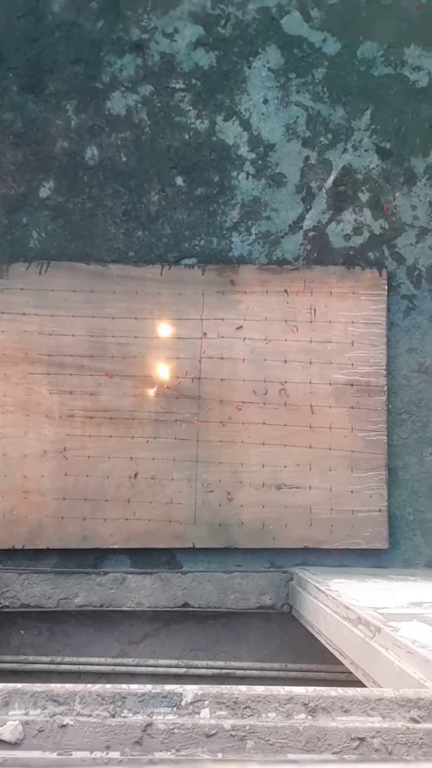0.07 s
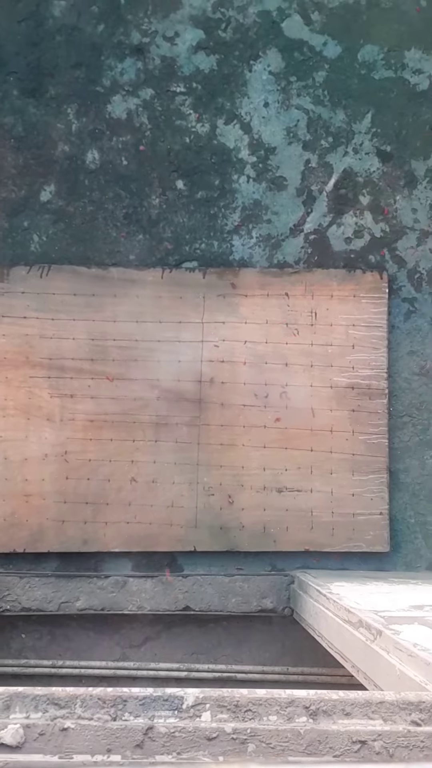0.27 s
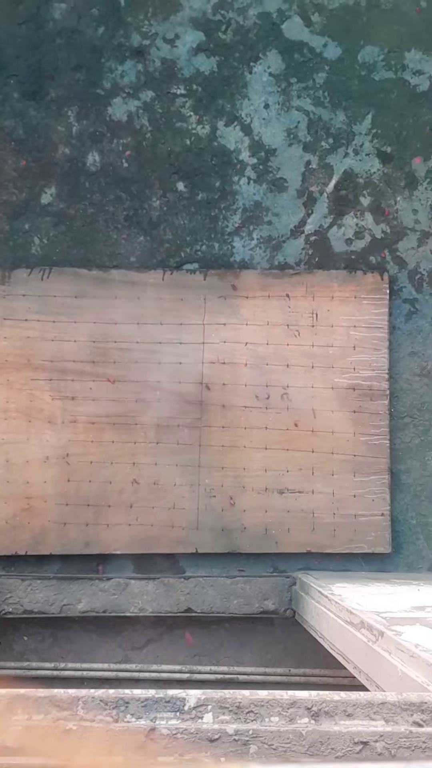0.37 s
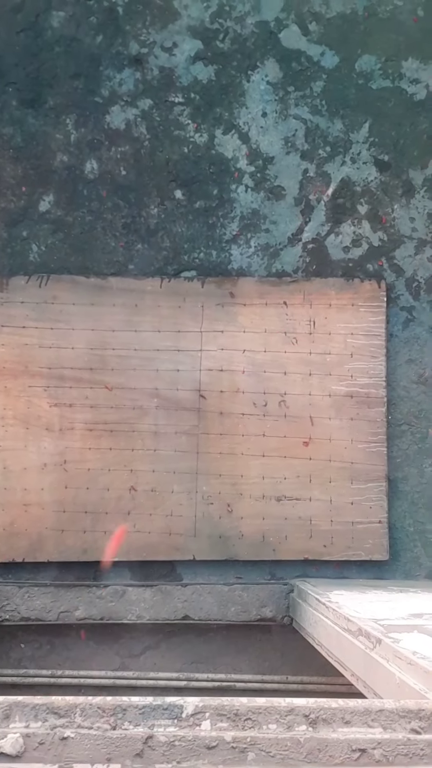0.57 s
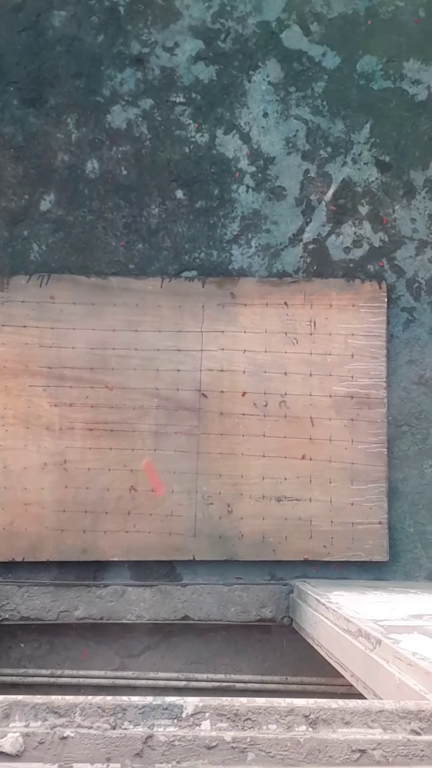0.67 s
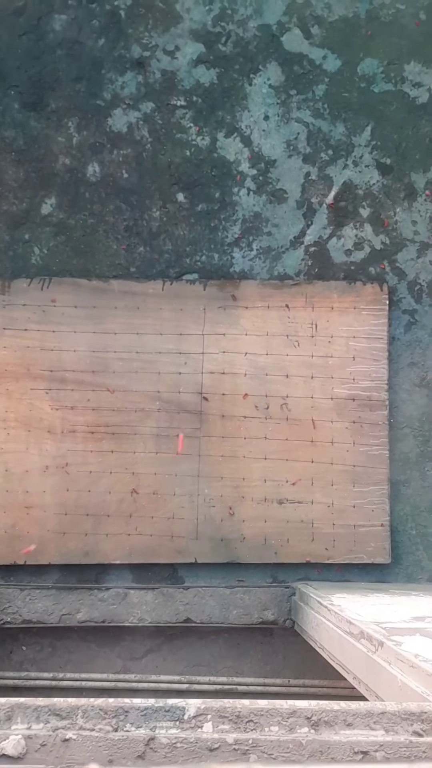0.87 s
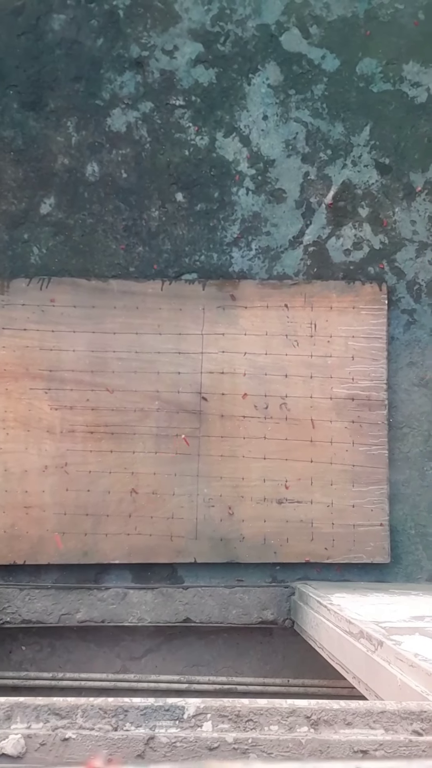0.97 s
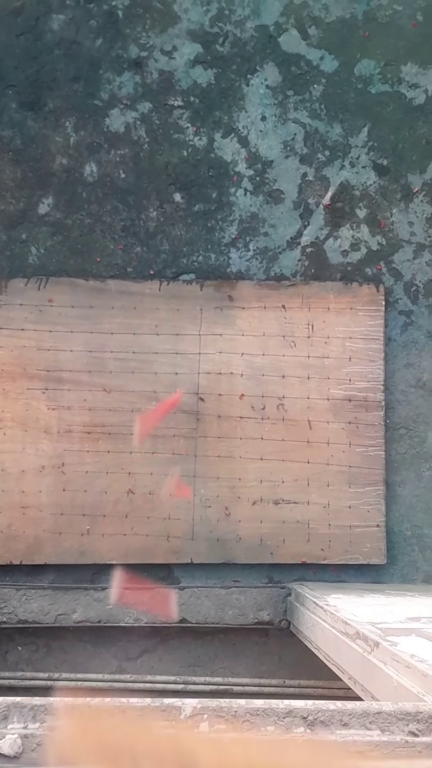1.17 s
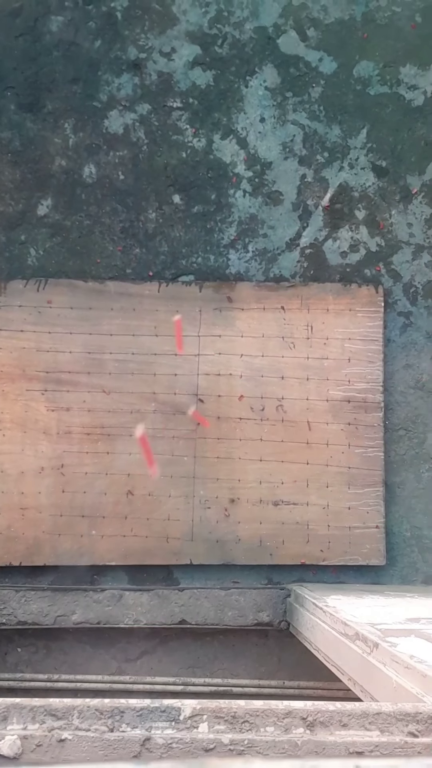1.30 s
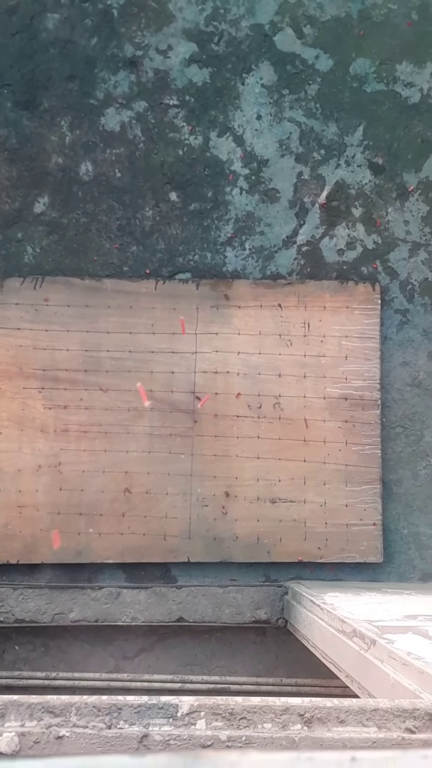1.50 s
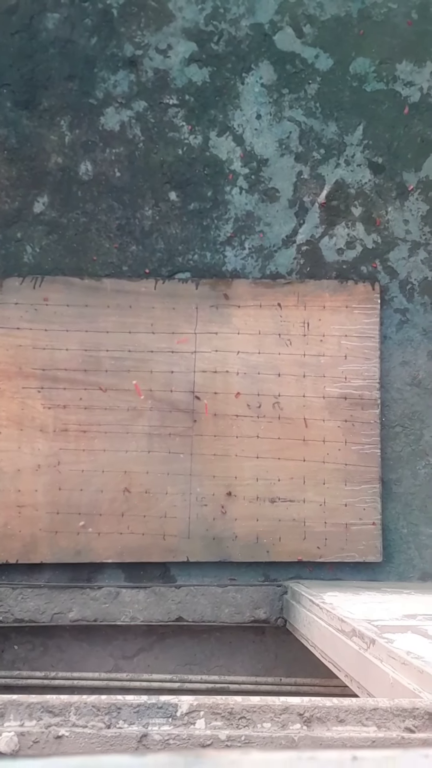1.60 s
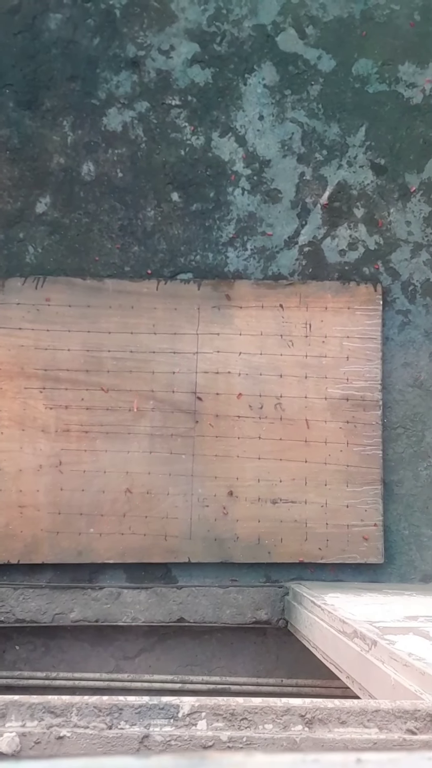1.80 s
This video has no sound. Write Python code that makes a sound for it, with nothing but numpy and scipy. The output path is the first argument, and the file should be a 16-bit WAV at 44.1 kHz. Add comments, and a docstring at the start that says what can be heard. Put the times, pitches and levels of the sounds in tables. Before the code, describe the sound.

Two small firecrackers bang in a walled yard. A stick knocks and scrapes lightly on a nearby sill, then the first bursts at 0.2 seconds, overloading the microphone into a falling, warbling squelch and low rumble until 0.45, its echo fading. Softer wooden taps come around 0.9 to 1.1 seconds. The second, shorter bang hits at 1.4 with a brief squelch, its reverberation dying into quiet air.

```python
"""A walled yard below a window, where two small firecrackers burst on a wooden board.
Each crack is reflected between the walls and dies away as reverberation; the blast buffets the
microphone and overloads it into a falling, warbling squelch. Before each bang a wooden stick knocks
and scrapes lightly on the sill close by. Beneath lie a brief handling rustle, a faint tone and quiet air."""
import sys
import numpy as np
from scipy import signal
from scipy.fft import rfft, irfft
from scipy.io import wavfile

SR = 44100
rng = np.random.default_rng(int(sys.argv[2]) if len(sys.argv) > 2 else 0)


def inscribe(sig):
    """Save sig as 16-bit PCM at rate SR to the path in sys.argv[1].

    A 1-D sig is mono; a 2-D sig holds one channel per row.
    Samples are clipped to [-1, 1] before scaling.
    """
    pcm = np.round(np.clip(np.atleast_2d(sig).T, -1, 1) * 32767)
    wavfile.write(sys.argv[1], SR, pcm.astype(np.int16))


N = 81585

# Body and treble of wood meeting the sill. Each row: frequency in Hz, relative spectral density in dB.
CLACK_SPECTRUM = [(60, -29.5), (130, -12.5), (250, 13), (900, -0.5), (1300, 1.5), (1900, 2), (2800, -4.5),
                  (4200, -8), (7000, -26.5), (16000, -42)]
TICK_SPECTRUM = [(500, -19.5), (3500, 5), (7000, -2), (12000, -5), (16000, -4.5)]


def firecracker(crack_db, roar_db, hold_s, roar_t60, tail_db, tail_stretch):
    """A sharp crack and a roar that holds briefly, then fades; reflection adds echoes and reverberation."""
    # Noise colours for the crack, roar and echoes; the roar's treble has a notch near 9.5 kHz.
    # Each row: frequency in Hz, relative spectral density in dB.
    crack_spectrum = [(40, -1.5), (200, 0), (600, -3.5), (1500, 2), (3000, -3.5), (6000, -17), (10000, -20),
                      (16000, -21)]
    roar_spectrum = [(30, -1.5), (100, 1), (300, 5), (800, -1), (2000, 0.5), (4000, -8), (7500, -10),
                     (9500, -25), (12000, -14.5), (16000, -27)]
    echo_spectrum = [(100, -1.5), (800, 3), (2500, 7.5), (5000, -3), (8000, -0.5), (10000, -13),
                     (16000, -6.5)]
    # Wall reflections. Each row: delay in seconds, level relative to the crack in dB.
    reflections = [(.0055, -6), (.0135, -20.5), (.03, -4), (0.032, -10.5), (.0585, -4.5), (.0795, -16),
                   (.089, -10.5)]
    out = amp(crack_db) * noise(crack_spectrum, correlation=.43) * fade(t60=.044) * pan(right_db=6)
    out += amp(roar_db) * noise(roar_spectrum) * fade(roar_t60, hold_s)
    for delay, db in reflections:
        add(out, delay, amp(crack_db + db) * noise(echo_spectrum) * fade(t60=.02))
    return out + amp(tail_db) * yard_reverberation(tail_stretch)


def yard_reverberation(stretch, rise_s=.012):
    """A diffuse field builds up, then decays by absorption, the treble first; stretch scales its t60."""
    # Colour of the field. Each row: frequency in Hz, relative spectral density in dB.
    spectrum = [(30, -12.5), (70, -11.5), (130, -4.5), (300, 0.5), (600, -2.5), (1400, -1), (2400, -3.5),
                (3800, -6.5), (5000, -12), (8000, -12), (10000, -24), (16000, -26.5)]
    # Reverberation times. Each row: frequency in Hz, t60 in seconds at a stretch of 1.
    decay_times = [(60, 1.1), (250, 0.93), (700, 1.25), (2000, 1.14), (3800, 1.0266), (6000, 0.71),
                   (9000, .58), (12000, 0.88), (15000, .38)]
    hz, t, bands = signal.stft(noise(spectrum, correlation=.15), SR, nperseg=512)
    t60 = stretch * read(decay_times, hz)[:, None]
    tail = signal.istft(bands * amp(-60 * t / t60), SR, nperseg=512)[1][:, :N]
    return tail * (1 - np.exp(-np.arange(N) / SR / rise_s))


def squelch(contour, channel_db, warble, grit):
    """Random frequency modulation roughens a gliding tone; warble and grit are shares of its pitch."""
    times, hz, db = np.transpose(contour)
    t = np.arange(N) / SR
    glide = np.exp(np.interp(t, times, np.log(hz)))
    pitch = glide * (1 + warble * wander(hz=150.17) + grit * wander(hz=753))
    phase = 2 * np.pi * np.cumsum(pitch, axis=1) / SR
    rasp = amp(-14) * np.cos(2 * phase)
    tone = np.sqrt(2) * (np.sin(phase) + rasp)
    flutter_db = 1.5 * wander(hz=234)
    level = amp(np.interp(t, times, db) + flutter_db) * (t >= times[0]) * (t <= times[-1])
    return high_pass(tone * level, hz=50) * amp(channel_db)[:, None]


def overload():
    """Driven beyond its linear range, the microphone squelches, falling in pitch as each blast ebbs."""
    # Course of each squelch. Each row: time in seconds, pitch in Hz, level in dB before channel gain.
    first_contour = [(.213, 1507, -41), (.252, 2698, -17), (.285, 1748, -11.5), (.312, 1148, -8),
                     (.338, 599.5, -12.5), (.36, 821.8, -9), (.374, 312.3, -7.5), (.402, 326.8, -11),
                     (.417, 124.6, -10.5), (.435, 80.5, -32), (.455, 65.5, -45)]
    second_contour = [(1.409, 349.7, -19.5), (1.414, 398, -20), (1.4165, 1309, -9.5), (1.421, 655.5, -6),
                      (1.425, 1254, -11.5), (1.43, 410, -6.5), (1.436, 452, -7.5), (1.441, 223, -14),
                      (1.445, 604, -1), (1.45, 1159, -10.5), (1.454, 487, -11), (1.469, 439, -7),
                      (1.474, 74.9, -17.5), (1.505, 55, -46)]
    first = squelch(first_contour, channel_db=(0, -2.2), warble=.55, grit=.45)
    second = squelch(second_contour, channel_db=(-39, -.4), warble=.365, grit=.25)
    return first + second


def buffeting():
    """The pressure wave passing the microphone ports raises swells of low rumble."""
    # Gaussian swells. Each row: centre and half width in seconds, left and right levels in dB.
    swells = [(0.342, 0.021, -22, -13.5), (.395, 0.025, -22.5, -25.5), (1.454, 0.0163, -53.5, -22)]
    # The rumble. Each row: frequency in Hz, relative spectral density in dB.
    spectrum = [(20, -31.5), (45, -9.5), (75, -4), (125, 0), (200, -5.5), (400, -18), (1500, -48.5),
                (16000, -90.5)]
    t = np.arange(N) / SR
    envelope = sum(amp([[left], [right]]) * np.exp(-((t - centre) / width) ** 2)
                   for centre, width, left, right in swells)
    return noise(spectrum) * envelope


def knock(ring_db, pitch_factor, clack_db, tick_db, click_t60, rise_s=.00082):
    """An impact makes a broadband click and excites the damped normal modes of the wood."""
    # Wood modes. Each row: frequency in Hz at a pitch factor of 1, relative level in dB, t60 in seconds.
    modes = [(220.3, -8.5, 0.11), (255, -13.5, 0.041), (364, -6.5, 0.24), (427.6, 1, .085), (492, -7, 0.06),
             (592.7, -12.5, .04), (900, -14, .04), (1060, -9, 0.015), (1840, -20, .05)]
    t = np.arange(N // 4) / SR
    ring = np.zeros((2, len(t)))
    for hz, db, t60 in modes:
        cycles = hz * pitch_factor * t + rng.normal(0, .032, (2, 1))
        ring += amp(db) * fade(t60)[:len(t)] * np.sin(2 * np.pi * cycles)
    onset = 1 - np.exp(-(t / rise_s) ** 2)
    clack = amp(clack_db) * noise(CLACK_SPECTRUM, correlation=.23)
    tick = amp(tick_db) * noise(TICK_SPECTRUM, correlation=.23)
    click = (clack + tick) * fade(click_t60)
    return amp(ring_db) * ring * onset + click[:, :len(t)]


def scrape(start, end, body_db, hiss_db, edge_s=.012):
    """Sliding friction makes noise whose amplitude fluctuates, heard as grain."""
    t = np.arange(N) / SR
    stroke = np.clip(np.minimum(t - start, end - t) / edge_s, 0, 1)
    grain = amp(2.5 * wander(hz=90.1))
    friction = amp(body_db) * noise(CLACK_SPECTRUM) + amp(hiss_db) * noise(TICK_SPECTRUM)
    return stroke * grain * friction


def stick():
    """Direct sound from the sill arrives a little to the right; the walls add a short reverberation."""
    # Impacts. Each row: start in seconds, ring level in dB, pitch factor, clack and tick levels in dB,
    # click t60 in seconds.
    knocks = [(.069, -29, 0.89, -22, -51.5, 0.047), (0.0887, -27.5, 0.97, -34, -52, 0.051),
              (0.126, -29, 0.94, -47, -52.5, 0.18), (.137, -29, 1.25, -45, -67, .03),
              (.145, -28, 0.79, -51, -71, 0.062), (.157, -34, 0.69, -54.5, -81.5, 0.037),
              (0.93, -34.5, 1.09, -45, -83.5, 0.034), (.955, -42.5, 1, -52.5, -84, 0.025),
              (1.001, -43.5, 1.08, -65, -89, 0.044), (1.0943, -43, 1.05, -37.5, -68, 0.049),
              (1.1166, -51.5, 1.01, -46, -45, 0.041), (1.142, -47.5, .95, -57, -69.5, 0.051)]
    # Sliding strokes. Each row: start and end in seconds, body and hiss levels in dB.
    scrapes = [(0.08, 0.152, -49, -59.5), (.178, 0.252, -41, -49), (0.966, 1.102, -62.5, -74.5)]
    direct = np.zeros((2, N))
    for start, *impact in knocks:
        add(direct, start, knock(*impact))
    for stroke in scrapes:
        direct += scrape(*stroke)
    direct = high_pass(direct, hz=162)
    response = yard_reverberation(stretch=.16)
    reflected = signal.fftconvolve(direct, response / np.linalg.norm(response[0]), axes=1)[:, :N]
    return direct * pan(right_db=4) + amp(-16.5) * reflected


def handling_rustle():
    """A low rustle of handling decays exponentially from the first instant."""
    # The rustle. Each row: frequency in Hz, relative spectral density in dB.
    spectrum = [(40, -17.5), (100, -3.5), (165, 7), (250, -7.5), (400, -3), (800, -15.5), (2500, -21.5),
                (5000, -34), (16000, -48.5)]
    return amp(-45.5) * noise(spectrum, correlation=.5) * fade(t60=.22)


def lingering_tone(start_s=1.17, hz=708, rise_s=.25, t60=.55):
    """A faint damped sinusoid swells and dies after the last knocks."""
    t = np.maximum(np.arange(N) / SR - start_s, 0)
    envelope = amp(-53 - 60 * t / t60) * (1 - np.exp(-t / rise_s))
    return envelope * np.sin(2 * np.pi * hz * t)


def outdoor_air():
    """Stationary ambient noise, strongest in the bass."""
    # Quiet air. Each row: frequency in Hz, relative spectral density in dB.
    spectrum = [(20, -20.5), (45, -11), (70, 10.5), (100, -5.5), (170, -5.5), (350, -16.5), (750, -18),
                (1500, -19.5), (2500, -24.5), (4500, -37.5), (16000, -43.5)]
    return amp(-66.5) * noise(spectrum, correlation=.5)


def amp(db):
    """Converts decibels to an amplitude ratio."""
    return 10 ** (np.asarray(db) / 20)


def unit(x):
    """Normalises to an rms of 1."""
    return x / np.sqrt(np.mean(x ** 2) + 1e-20)


def read(points, hz):
    """Interpolates a table on a logarithmic frequency axis."""
    frequencies, values = np.transpose(points)
    return np.interp(np.log(hz + 1), np.log(frequencies), values)


def add(mix, start_s, sound):
    """Superposes a stereo sound on the mix."""
    part = mix[:, max(round(start_s * SR), 0):][:, :sound.shape[1]]
    part += sound[:, :part.shape[1]]


def pan(right_db):
    """A level difference between the channels gives direction."""
    return amp([[-right_db / 2], [right_db / 2]])


def noise(spectrum, correlation=0):
    """Spectrally shaped Gaussian noise of rms 1, with a given correlation between the channels."""
    left, independent = rng.standard_normal((2, N))
    right = correlation * left + np.sqrt(1 - correlation ** 2) * independent
    gain = amp(read(spectrum, np.fft.rfftfreq(N, 1 / SR)))
    return unit(irfft(rfft([left, right]) * gain, N))


def fade(t60, hold_s=0):
    """A hold, then exponential decay by 60 dB in t60 seconds."""
    return amp(-60 * np.maximum(np.arange(N) / SR - hold_s, 0) / t60)


def wander(hz):
    """Band-pass noise near hz serves as a stereo modulator; envelope compression steadies its depth."""
    ratio = np.fft.rfftfreq(N, 1 / SR) / hz
    band = irfft(rfft(rng.standard_normal((2, N))) * ratio * np.exp(-ratio ** 2), N)
    envelope = abs(signal.hilbert(band))
    return unit(band / np.sqrt(envelope + 1e-9))


def high_pass(x, hz):
    """A second-order filter attenuates the bass below hz."""
    return signal.sosfilt(signal.butter(2, hz, "high", fs=SR, output="sos"), x)


def scene():
    """The background, the stick and the two firecrackers add by linear superposition."""
    # Bursts. Each row: start in seconds, crack and roar levels in dB, roar hold and t60 in seconds,
    # reverberation level in dB, stretch factor of the reverberation time.
    bangs = [(0.2131, -13, -15.5, 0.089, .2, -24.5, 1.077), (1.4079, -16, -33, 0.0294, 0.13, -27.5, 0.9093)]
    out = outdoor_air() + handling_rustle() + stick() + lingering_tone()
    for start, *burst in bangs:
        add(out, start, firecracker(*burst))
    return out


def record(dry):
    """The microphone adds squelch and buffeting; saturation rounds the peaks and filters limit the band."""
    x = high_pass(dry + overload() + buffeting(), hz=42)
    saturated = x / (1 + (x / .95) ** 6) ** (1 / 6)
    low_pass = signal.firwin(255, cutoff=15850, window=("kaiser", 9), fs=SR)
    return signal.oaconvolve(saturated, low_pass[None], "same")


dry = scene()
out = record(dry)
inscribe(out)
```